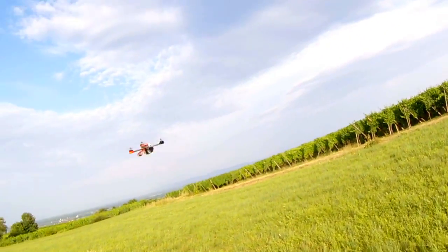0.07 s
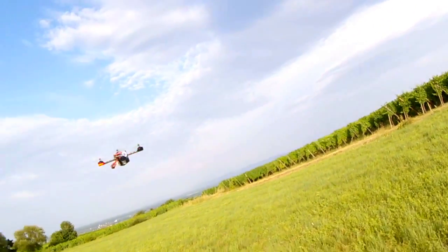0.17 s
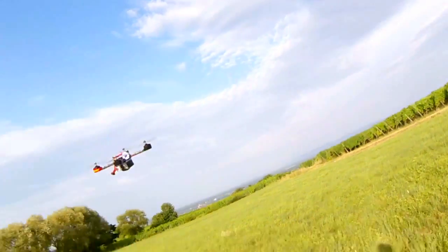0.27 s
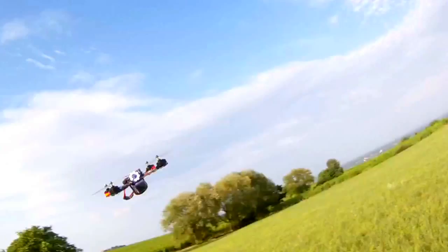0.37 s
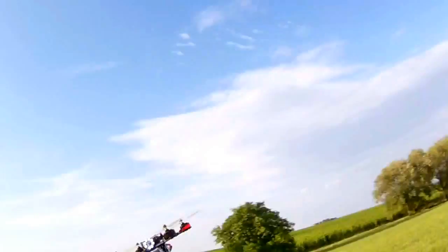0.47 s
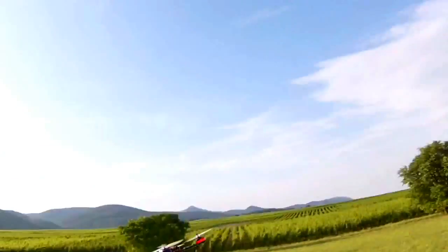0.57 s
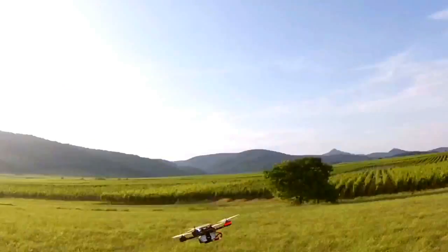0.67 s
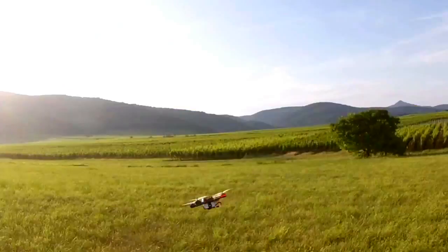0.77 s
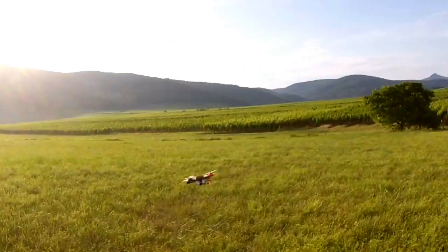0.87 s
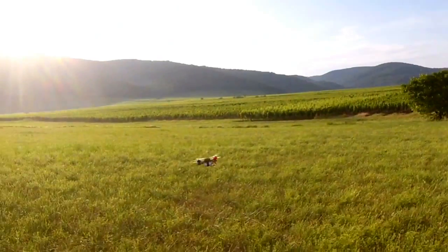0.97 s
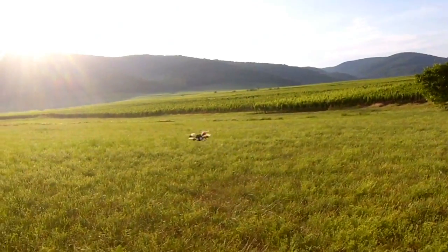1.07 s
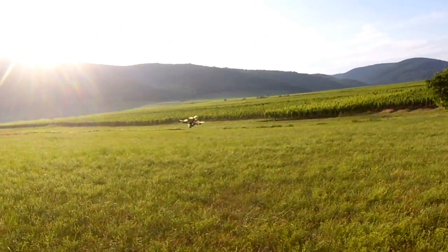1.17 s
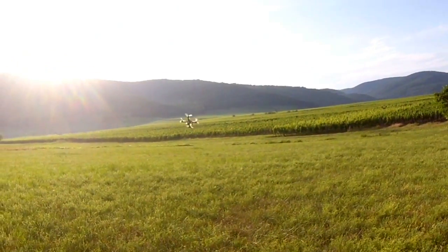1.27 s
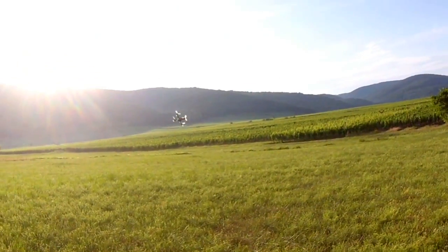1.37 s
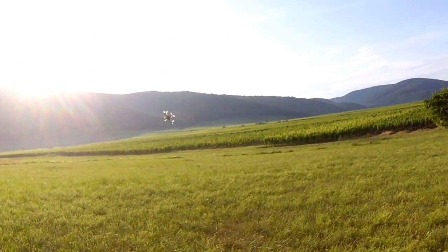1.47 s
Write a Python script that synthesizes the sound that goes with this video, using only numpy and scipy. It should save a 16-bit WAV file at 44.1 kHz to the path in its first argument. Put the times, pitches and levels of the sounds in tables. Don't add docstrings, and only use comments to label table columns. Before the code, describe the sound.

A small racing drone whines with slightly clashing rotor pitches over rushing propeller wash and wind, then the throttle punch sends it soaring before it cuts to a wavering idle; close, muffled onboard microphone, open field.

```python
import sys
import numpy as np
from scipy import signal
from scipy.fft import rfft, irfft, next_fast_len
from scipy.io import wavfile
from scipy.ndimage import uniform_filter1d, map_coordinates

SR = 44100
rng = np.random.default_rng(int(sys.argv[2]) if len(sys.argv) > 2 else 0)


def dump_mix(stems):
    frames = np.atleast_2d(stems).T
    limited = np.clip(frames, -1, 1)
    pcm = np.round(limited * 32767).astype(np.int16)
    wavfile.write(sys.argv[1], SR, pcm)


def linear_from_db(decibels):
    return 10 ** (np.asarray(decibels, float) / 20)


N = 68355
BLADES = 3
HIGH_SKIRT_DB = 9

# time in seconds, level in dB.
WASH_LEVEL = [(0, -65), (.2, -58.5), (.35, -58.5), (.42, -58.5), (.61, -54.5), (.665, -56), (.74, -55.5),
              (.815, -57.5), (.95, -57.5), (1.02, -59.5), (1.15, -61), (1.27, -65), (1.37, -70.5),
              (1.55, -70)]


def unit(x):
    return x / np.sqrt(np.mean(x ** 2) + 1e-20)


def curves(rows):
    s, *cols = np.transpose(rows)
    t = np.arange(N) / SR
    return [uniform_filter1d(np.interp(t, s, c), size=500) for c in cols]


def gate(rows):
    t, fade_s = np.arange(N) / SR, 0.044
    fade_in = np.clip((t - rows[0][0]) / fade_s + 1, 0, 1)
    fade_out = np.clip((rows[-1][0] - t) / fade_s + 1, 0, 1)
    return fade_in * fade_out


def wobble(rate):
    knots = rng.standard_normal(N // 50)
    return map_coordinates(knots, [np.arange(N) * np.clip(rate, .1, 800) / SR])


def coloured(x, points):
    m = next_fast_len(N + 8192)
    f, db = np.transpose(points)
    gain = linear_from_db(np.interp(np.log(np.fft.rfftfreq(m, 1 / SR) + 1), np.log(f + 1), db))
    return unit(irfft(rfft(x, m) * gain, m)[:N])


def patchy(patchy_db):
    z = signal.stft(rng.standard_normal(N), nperseg=1024)[2]
    field = uniform_filter1d(rng.standard_normal(z.shape), size=5, axis=0)
    field = uniform_filter1d(field, size=5, axis=1)
    return signal.istft(z * linear_from_db(patchy_db * unit(field)), nperseg=1024)[1][:N]


def turning(hz, hunt=1):
    jitter = 0.00417 * wobble(44.89)
    return 2 * np.pi * np.cumsum(hz * (1 + hunt * jitter)) / SR


def tone(phase, db, flutter_db=4.5, blur_db=0):
    loose = np.clip((-48 - db) / 12 + 1.5, .25, 1)
    skirt = linear_from_db(-17.5 + blur_db) * loose * (wobble(260) + 1j * wobble(260))
    start = np.exp(2j * np.pi * rng.random())
    level = np.sqrt(2) * linear_from_db(db + loose * flutter_db * wobble(30))
    return level * np.real((1 + skirt) * start * np.exp(1j * phase))


def rotor(rows, shaft_db, blur_db=0):
    # shaft order, level in dB at the reference speed, slope in dB per octave of speed.
    shaft_orders = [(4, -72.5, 19), (7, -74, -22), (8, -70.5, -9.5), (12, -77, -31)]
    hz, *levels = curves(rows)
    phase = turning(hz)
    blades = 0
    for k, db in enumerate(levels):
        flutter_db = 1.5 if k else 1.2
        blades = blades + tone((k + 1) * phase, db, flutter_db, blur_db + HIGH_SKIRT_DB * k * k / 6)
    wash_db, = curves(WASH_LEVEL)
    near_db = shaft_db + wash_db - wash_db.mean()
    shaft = 0
    for order, db, slope in shaft_orders:
        speed_db = slope * np.log2(hz / 560)
        shaft = shaft + tone(order * phase / BLADES, db + near_db + speed_db)
    return gate(rows) * (blades + shaft), phase


def front_rotor():
    # time in seconds, blade rate in Hz, levels of the blade tone, its 2nd and its 3rd in dB.
    cruise = [(0, 577.3, -64, -78, -80), (.07, 574.3, -58, -74, -58.5), (.126, 574.2, -55.5, -62, -73),
              (.19, 579.8, -51, -57, -58), (.22, 578.3, -51.5, -47.5, -56.5),
              (.3, 571.6, -51, -48.5, -64.5), (.345, 565.2, -48.5, -56, -60), (.385, 563, -59, -46, -71),
              (.43, 569.4, -54.5, -48, -68), (.46, 555.5, -65, -43, -64), (.48, 540, -49.5, -47, -46),
              (.53, 559.9, -53.5, -46.5, -56.5), (.575, 560, -47, -45, -51), (.625, 557, -57.5, -73, -56),
              (.665, 550.2, -50, -53, -58), (.7, 554, -44.5, -48.5, -58), (.76, 557.4, -45.5, -60, -71),
              (.8, 553.8, -51, -59, -68)]
    punch = [(0.829, 570, -51.5, -47, -63), (.86, 598.4, -55, -43, -68), (0.891, 615.2, -55, -50, -50.5),
             (0.912, 677.5, -62, -43, -70), (0.923, 682.2, -59, -48, -72),
             (0.934, 729.4, -55.5, -36.5, -61), (0.949, 768, -42.5, -47, -73),
             (.972, 804.3, -37, -44.5, -62), (0.993, 921, -30.5, -55, -62),
             (1.027, 930.9, -30.5, -58, -67.5), (1.054, 992, -28, -55, -69),
             (1.084, 1017, -28, -61.5, -74.5), (1.129, 969, -32.5, -54, -67),
             (1.173, 972.2, -33.5, -58, -80.5), (1.203, 925.4, -39, -49.5, -74),
             (1.239, 801.6, -51, -67.5, -66), (1.279, 794.5, -55, -71.5, -64),
             (1.309, 678.6, -67, -62, -75)]
    return rotor(cruise + punch, shaft_db=0)


def unbalance(phase):
    # time in seconds, once-a-turn level in dB, twice-a-turn level in dB.
    shake = [(0, -71, -66), (.05, -71.5, -60), (.12, -74, -67.5), (.19, -68.5, -58), (.28, -73, -69),
             (.4, -71, -57), (.5, -68.5, -59.5), (.62, -68.5, -67), (.75, -68.5, -73.5), (.9, -73, -63.5),
             (.95, -61, -63), (1.0, -52, -56.5), (1.04, -49.5, -63), (1.09, -48.5, -66), (1.15, -52, -60.5),
             (1.2, -57, -60), (1.25, -64.5, -66), (1.3, -72.5, -69)]
    tones = [tone((k + 1) * phase / BLADES, db, flutter_db=1) for k, db in enumerate(curves(shake))]
    return gate(shake) * sum(tones)


def overtones(phase):
    # time in seconds, 4th level in dB, 5th level in dB.
    upper = [(.82, -68, -80), (.87, -76, -74), (.93, -63, -80), (.97, -68, -82), (1.0, -88, -90),
             (1.06, -79, -84), (1.1, -88, -92), (1.16, -83, -90), (1.2, -84, -90), (1.25, -92, -79),
             (1.29, -94, -83)]
    tones = [tone((k + 4) * phase, db, blur_db=HIGH_SKIRT_DB) for k, db in enumerate(curves(upper))]
    return gate(upper) * sum(tones)


def rear_rotor():
    # time in seconds, blade rate in Hz, levels of the blade tone and its 2nd in dB.
    rear = [(0.0, 488.7, -66.5, -67), (0.07, 495.3, -54, -58), (0.16, 497.2, -52, -60.5),
            (0.2, 489.5, -55, -58), (0.25, 502, -46.5, -56), (0.32, 504.7, -49, -57.5),
            (0.37, 493.3, -66.5, -51), (0.41, 502.4, -48.5, -60), (0.44, 491.7, -53.5, -48),
            (0.48, 495.6, -51, -50.5), (0.53, 505.6, -67, -52.5), (0.59, 495.4, -51.5, -51),
            (0.645, 491.5, -58, -56), (0.7, 493.5, -54, -54), (0.75, 486.8, -64, -55),
            (0.84, 518.8, -52.5, -56), (0.9, 570.7, -57.5, -52.5), (0.95, 659.1, -53, -58.5),
            (1.0, 642, -56.5, -52.5), (1.035, 772.7, -47.5, -54.5), (1.08, 748.4, -51.5, -61.5),
            (1.13, 794, -47, -61.5), (1.18, 725.3, -58.5, -58.5), (1.22, 680, -54.5, -58.5),
            (1.26, 621, -64.5, -75)]
    return rotor(rear, shaft_db=-13.5)


def far_rotor():
    # time in seconds, tone in Hz, level in dB.
    glide = [(0.88, 1120, -57), (0.92, 1160.9, -55), (0.98, 1088, -53.5), (1.01, 1259, -53.5),
             (1.07, 1270, -51.5), (1.11, 1216, -54), (1.14, 1381, -52), (1.19, 1382, -55.5),
             (1.23, 1290, -59)]
    # middle in seconds, length in
    # seconds, pitch in Hz, level in dB.
    whistles = [(.55, .2, 1370, -60), (.57, .35, 1255, -58), (.64, .05, 1175, -48), (.69, .05, 1560, -51),
                (.735, .05, 2230, -54), (.38, .05, 2250, -57), (1.36, .05, 1390, -58),
                (1.37, .1, 2040, -67), (1.48, .12, 2000, -68), (1.26, .06, 1070, -59),
                (.955, .025, 1490, -47), (.53, .05, 1490, -52), (.62, .07, 1510, -52),
                (.76, .03, 1600, -53), (.69, .03, 1270, -54), (.815, .03, 1560, -51),
                (1.012, .03, 1250, -53), (1.17, .05, 1400, -52),
                (.805, .04, 2780, -64), (1.21, .05, 1150, -55), (1.24, .04, 660, -60), (.52, .08, 1400, -54),
             (.58, .05, 1370, -52), (.6, .1, 1270, -54), (.7, .04, 1680, -53), (.55, .05, 2050, -58),
             (.69, .04, 2000, -57), (.13, .06, 2050, -62), (.055, .03, 1550, -56), (.23, .04, 1550, -58),
             (.29, .04, 1280, -56)]
    hz, db = curves(glide)
    t = np.arange(N) / SR
    out = gate(glide) * tone(turning(hz), db)
    for s, length, pitch, level in whistles:
        swell = np.exp(-(2 * (t - s) / length) ** 2)
        out = out + swell * tone(turning(pitch, hunt=2), level, flutter_db=2)
    return out


def idle_rotor():
    # time in seconds, blade rate in Hz, levels of the blade tone and its 2nd in dB.
    idle = [(1.27, 560.6, -61, -57.5), (1.305, 597, -60.5, -65), (1.33, 592.4, -49, -79),
            (1.35, 679, -54.5, -56), (1.366, 685, -61.5, -79), (1.382, 670, -54, -67),
            (1.398, 538.8, -54, -68), (1.424, 543, -61, -60), (1.445, 588.6, -60, -67),
            (1.468, 613.7, -52.5, -67), (1.483, 587.5, -69, -63), (1.51, 573.7, -63, -63),
            (1.525, 538, -70, -63), (1.549, 516, -59, -57)]
    sound, _ = rotor(idle, shaft_db=-5, blur_db=7)
    return linear_from_db(2.5 * wobble(41.26)) * sound


def rasp(phase):
    # time in seconds, level in dB.
    rasp_level = [(0, -74), (.1, -69), (.35, -65.5), (.5, -64.5), (.62, -62), (.67, -70), (.74, -56),
                  (.82, -71.5), (.94, -57), (1.0, -68), (1.12, -72), (1.21, -69), (1.3, -75), (1.4, -80),
                  (1.55, -82)]
    # frequency in Hz, density in dB per Hz.
    rasp_colour = [(1200, -63), (2000, -6.5), (2800, 3), (3500, -8.5), (4900, -14.5), (5600, -28.5)]
    level_db, = curves(rasp_level)
    noise = patchy(1.6) * (1 + 0.54 * np.cos(phase))
    return linear_from_db(level_db + wobble(21.56)) * coloured(noise, rasp_colour + [(9000, -120)])


def wash(*phases):
    # frequency in Hz, density in dB per Hz.
    wash_colour = [(100, -30.5), (350, -16), (760, -14), (1300, -5.5), (2300, -13), (3200, -30.5),
                   (4900, -32.5), (5600, -52)]
    chop = 1 + 0.25 * sum(np.cos(p) for p in phases)
    level_db, = curves(WASH_LEVEL)
    noise = coloured(patchy(1.6) * chop, wash_colour + [(9000, -120)])
    return linear_from_db(level_db + 8.5 + wobble(14.1)) * noise


def wind():
    # frequency in Hz, density in dB per Hz.
    wind_colour = [(25, -45), (60, -21), (200, -4), (480, -0.5), (760, -7.5), (1150, 3.5), (2200, -35),
                   (3500, -43.5)]
    noise = coloured(patchy(4.0), wind_colour + [(6000, -120)])
    return linear_from_db(-59.5 + 0.63 * wobble(8.0)) * noise


def ticks():
    # time in seconds, peak level in dB.
    knocks = [
        (.0245, -41),
        (.055, -33),
        (.3782, -41),
        (.684, -33),
        (.8368, -25),
        (1.317, -53),
    ]
    # ring in Hz, time to fall 60 dB in seconds.
    rings = [(1250, .008), (1100, .009), (3200, .005), (1300, .006), (1200, .007), (330, .02)]
    out, t = np.zeros(N + SR), np.arange(SR // 20) / SR
    rise = (1 - np.exp(-t / .0004)) ** 2
    for (s, db), (hz, t60) in zip(knocks, rings):
        ring = np.sin(2 * np.pi * hz * t)
        crack = linear_from_db(-8) * np.sin(2 * np.pi * 1.48 * hz * t)
        out[round(s * SR):][:len(t)] += linear_from_db(db - 60 * t / t60) * rise * 2 * (ring + crack)
    return out[:N]


def preamp_hiss():
    # frequency in Hz, density in dB per Hz.
    hiss_colour = [(3240, -45.5), (5500, 14), (6490, 15), (9190, 11), (15200, 8)]
    return linear_from_db(-78.5) * coloured(rng.standard_normal(N), hiss_colour)


def scene():
    front, front_phase = front_rotor()
    rear, rear_phase = rear_rotor()
    loud = front + unbalance(front_phase) + overtones(front_phase)
    others = rear + far_rotor() + idle_rotor()
    air = rasp(front_phase) + wash(front_phase, rear_phase) + wind()
    return (loud + others + air + ticks())[None]


def roll_off(x):
    return signal.sosfilt(signal.butter(12, 15300, fs=SR, output="sos"), x)


def record(dry):
    noisy = dry + preamp_hiss()
    bass_cut = signal.butter(2, 70, "high", fs=SR, output="sos")
    mix = signal.sosfilt(bass_cut, noisy)
    return roll_off(mix)


dry = scene()
out = record(dry)
dump_mix(out)
```